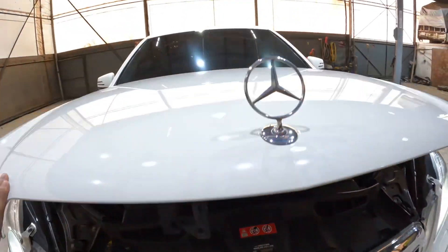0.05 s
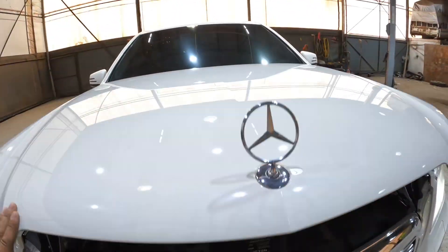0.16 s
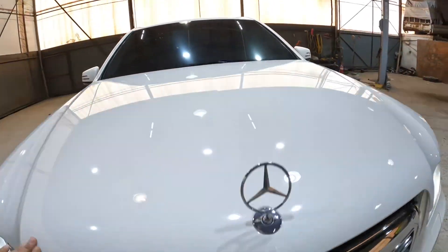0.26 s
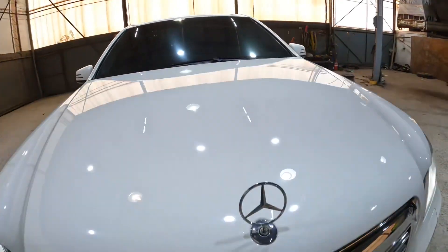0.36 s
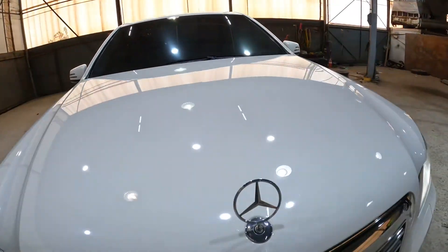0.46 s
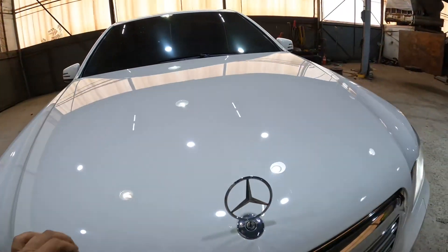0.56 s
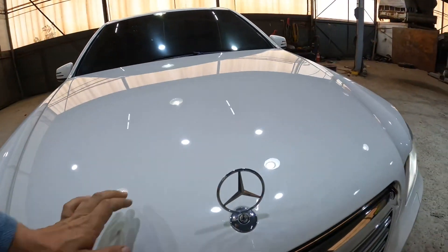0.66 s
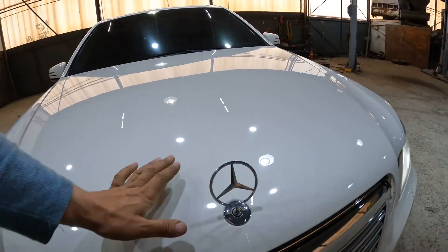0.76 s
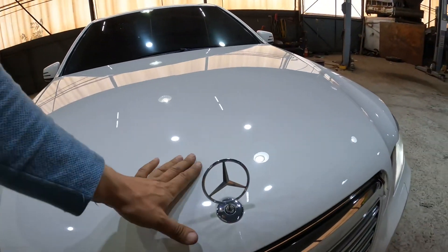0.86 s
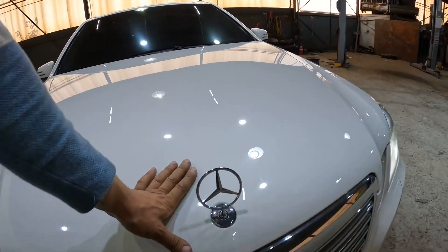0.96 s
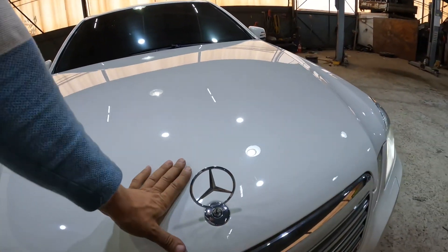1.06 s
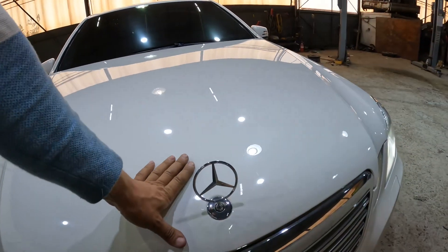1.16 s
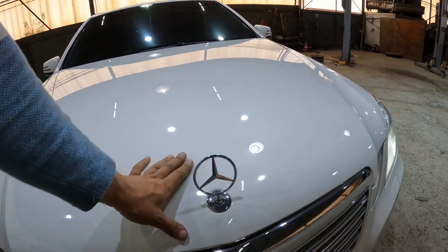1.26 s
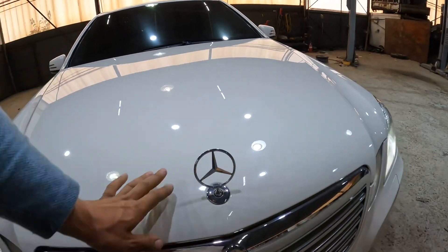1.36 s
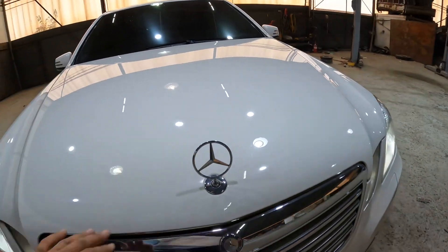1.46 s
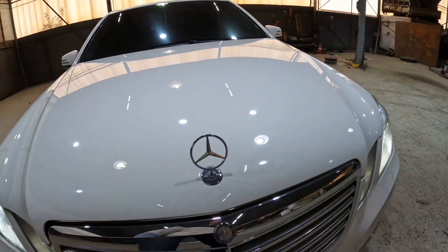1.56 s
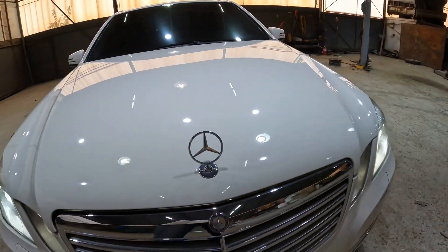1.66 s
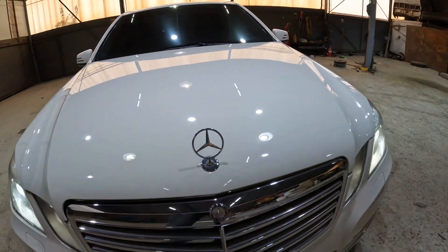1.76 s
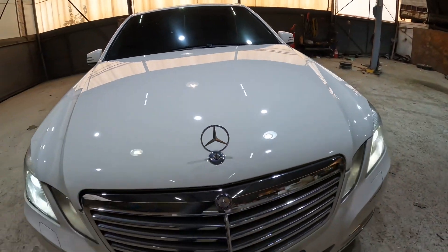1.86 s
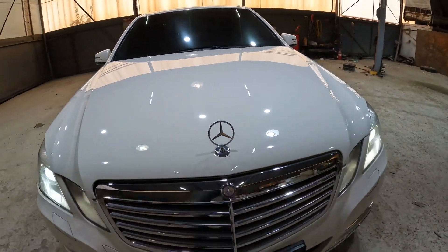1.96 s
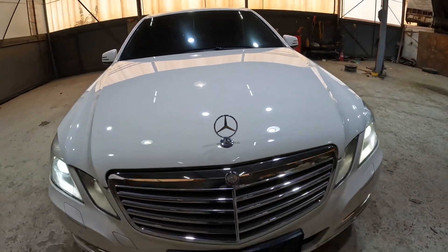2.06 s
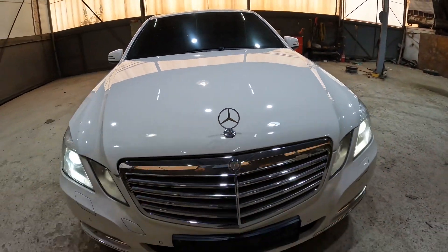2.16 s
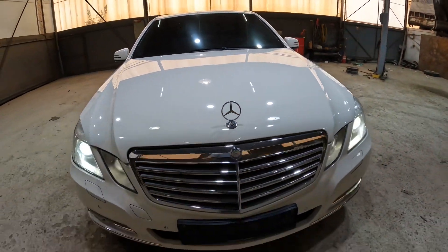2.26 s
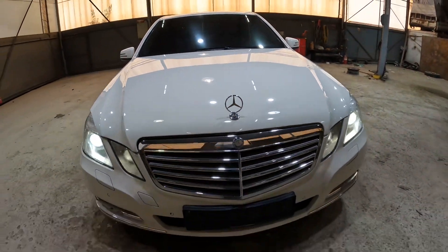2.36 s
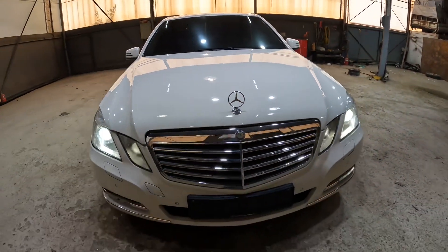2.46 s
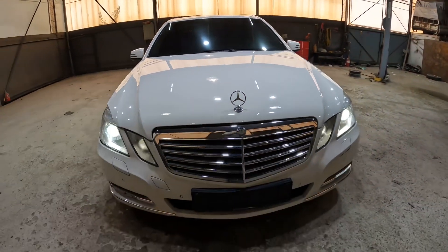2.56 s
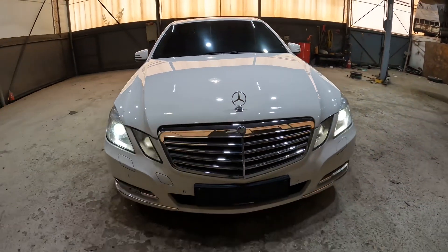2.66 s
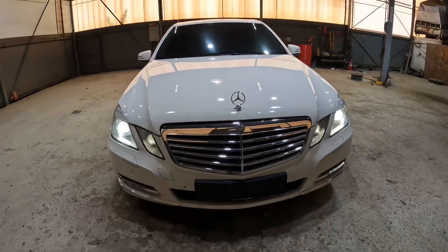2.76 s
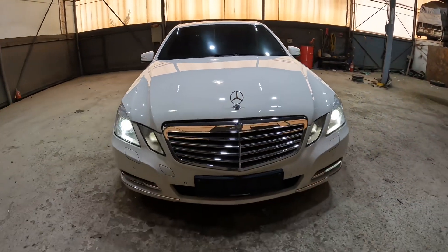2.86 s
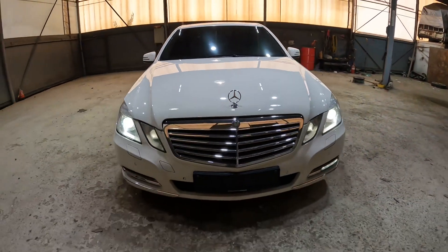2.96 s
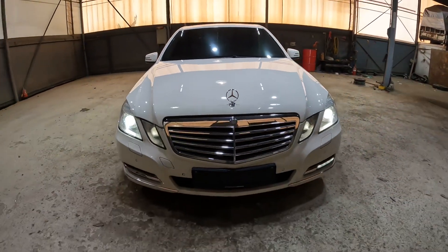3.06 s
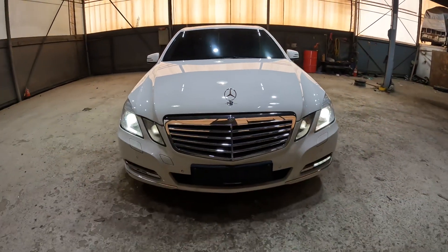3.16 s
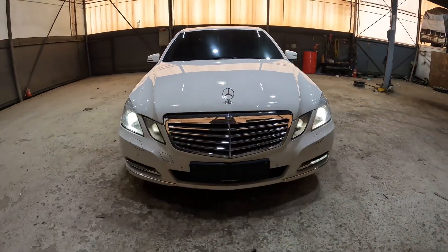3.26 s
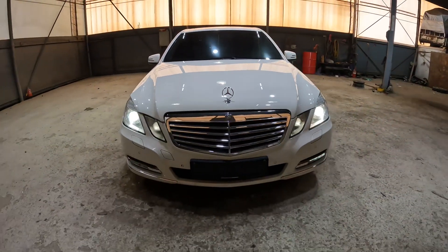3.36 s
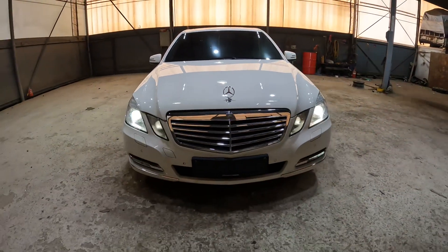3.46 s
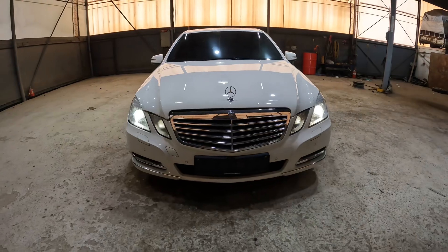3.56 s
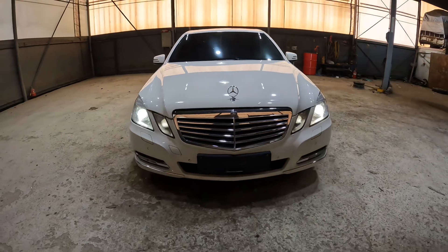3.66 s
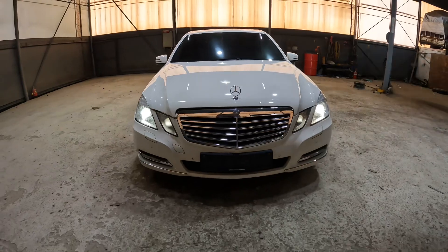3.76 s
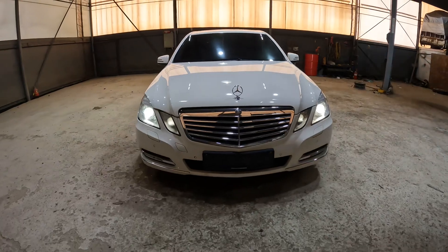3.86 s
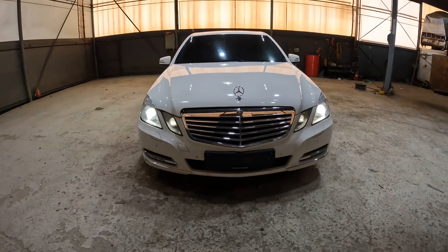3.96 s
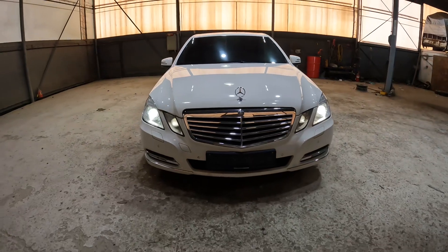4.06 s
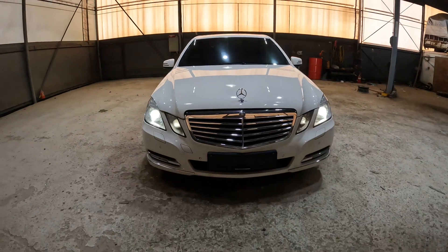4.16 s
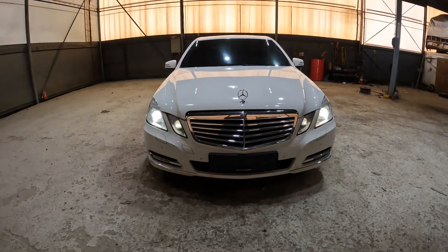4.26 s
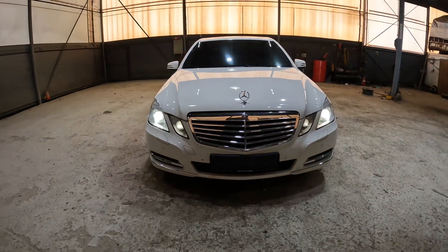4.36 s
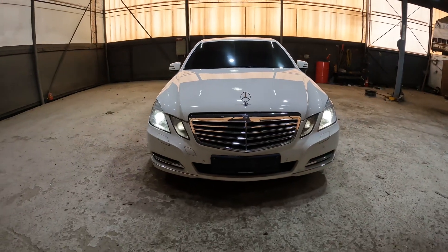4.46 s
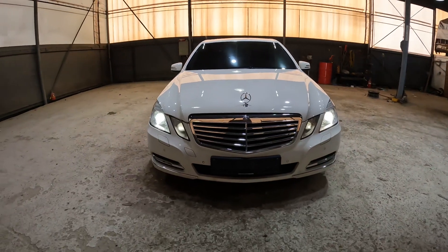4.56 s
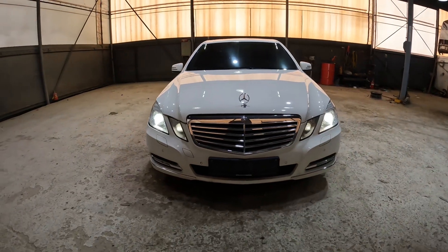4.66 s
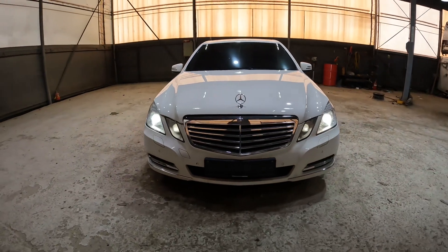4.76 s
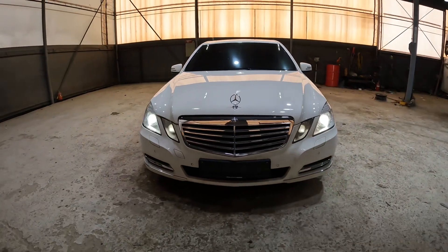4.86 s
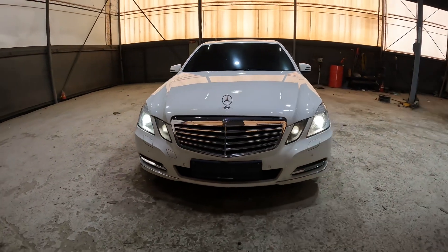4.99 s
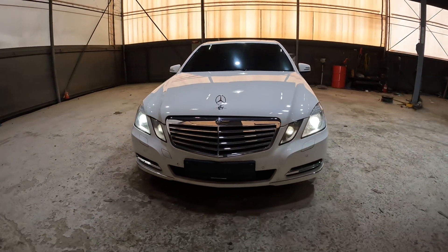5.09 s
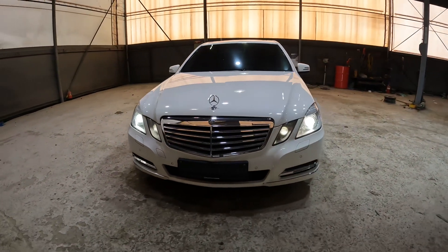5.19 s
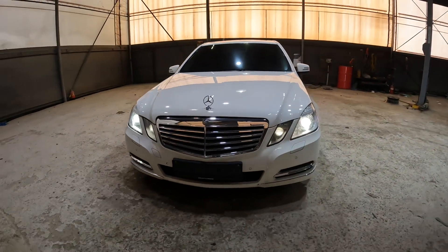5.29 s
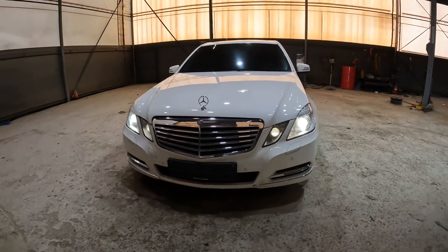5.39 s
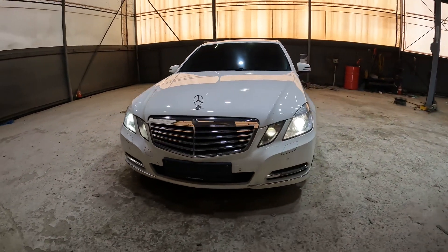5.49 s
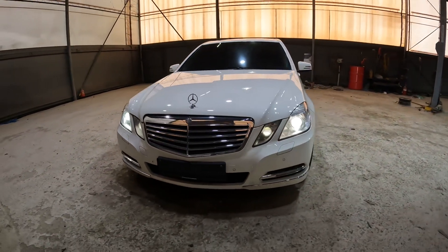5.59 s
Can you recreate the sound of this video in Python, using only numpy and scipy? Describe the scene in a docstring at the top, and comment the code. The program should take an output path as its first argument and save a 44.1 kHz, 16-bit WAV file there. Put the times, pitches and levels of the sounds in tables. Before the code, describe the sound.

A car engine idles steadily in a big hard-walled shed, heard close by with the hood raised: low throbbing rumble, whirring fan and belts, fine ticking hiss. At about 0.36 s the hood drops onto its latch with a sharp metallic clack, sheet-metal clatter and hollow boom, rebounding in a rapid rattle until about 0.57 s. Echoes fade and the engine turns muffled. At 1.06 s the hood is pressed home with a tight cluster of thumps and latch cracks; a tiny spring tick follows near 1.25 s. From 1.6 s the listener backs away and the engine gradually grows louder through the grille, levelling near 2.8 s. Thin squeaks and grit snaps come between 2.2 and 3.3 s, with a faint belt whistle swelling around 3.2 s. A soft bump lands at 3.1 s, a quick sole scuff at 3.55 s, and deep soft bumps at 4.4 and 4.9 s over the unbroken idle to the end.

```python
"""A car engine idles in a large shed; its hood drops, rattles and rebounds, then is pressed home with a thump.
The shut hood muffles the engine. The listener steps back over gritty concrete, with small squeaks,
bumps and a scuff, and the engine and its fan grow louder again through the grille.
The engine is coloured noise, steady hums and wavering whistles, pulsing as the cylinders fire.
The hood is ringing tones and short noise bursts; steps are bursts, squeaks are unsteady tones, all with echoes."""
import sys
import numpy as np
from scipy import signal
from scipy.fft import rfft, irfft
from scipy.io import wavfile

SR = 44100
rng = np.random.default_rng(int(sys.argv[2]) if len(sys.argv) > 2 else 0)


def unload_wav(signal):
    """Save mono or channel-first audio to the path in sys.argv[1] as 16-bit WAV at rate SR, clipped to [-1, 1]."""
    wavfile.write(
        sys.argv[1],
        SR,
        np.round(np.clip(np.atleast_2d(signal).T, -1, 1) * 32767).astype(np.int16),
    )


N = 248283
TIME = np.arange(N) / SR

# colour of deep rumbles, from engine, car body and steps: (frequency [Hz], level [dB per Hz])
RUMBLE_COLOUR = [(8, -1), (26, 2.5), (48, -1), (75, -9.5), (120, -12), (190, -15.5), (250, -27), (400, -49)]
# dense higher modes of the hood's sheet metal: (frequency [Hz], level [dB per Hz])
SHEET_COLOUR = [(50, -22), (130, 6), (200, 4), (360, -0.5), (550, -6), (800, -5.5), (1300, -11),
                (2100, -18), (4000, -24.5), (10000, -43.5)]
# sharp cracks, of the latch and of grit: (frequency [Hz], level [dB per Hz])
CRACK_COLOUR = [(400, -23), (1000, 1.5), (2000, 4.5), (3200, 2), (5400, 0.5), (7400, -5), (8800, -15),
                (10300, -7.5), (14500, -28)]

# the listener steps back, out of the hood's shadow and then away from the engine bay [s]
LEAVES_S, FACES_GRILLE_S, STOPS_S = 1.56, 2.795, 3.2


def from_db(db):
    """Turn decibels into a gain."""
    return 10 ** (np.asarray(db) / 20)


def rms_one(x):
    """Scale a sound to unit power."""
    return x / np.sqrt(np.mean(x ** 2) + 1e-20)


def at_hz(points, hz):
    """Read a table between its points, on a logarithmic frequency axis."""
    table_hz, value = np.transpose(points)
    return np.interp(np.log(np.maximum(hz, 1)), np.log(table_hz), value)


def ramp(start_s, end_s):
    """Rise evenly from 0 to 1 between two times."""
    return np.clip((TIME - start_s) / (end_s - start_s), 0, 1)


def noise(colour, size=N, side_db=0):
    """Stereo noise of a given colour that weakens beyond the colour's ends; unit power."""
    # how wide the stereo is: (frequency [Hz], side relative to mid [dB])
    stereo_width = [(30, -12.5), (90, -32.5), (250, -16), (500, -11), (1100, -9.5), (2000, -5), (4500, -8),
                    (9000, -7.5), (14000, -3)]
    hz = np.arange(size // 2 + 1) * SR / size
    low_end = np.minimum(1, hz / colour[0][0])
    high_end = np.minimum(1, colour[-1][0] / (hz + 1))
    shape = from_db(at_hz(colour, hz)) * (low_end * high_end) ** 2
    mid, side = rfft(rng.standard_normal((2, size))) * shape
    side = side * from_db(at_hz(stereo_width, hz) + side_db)
    return rms_one(irfft([mid + side, mid - side], size))   # left, right


def drift(rate_hz):
    """Smooth random wandering of unit power; a higher rate wanders faster."""
    hz = np.arange(N // 2 + 1) * SR / N
    smoothed = rfft(rng.standard_normal(N)) / (1 + (hz / rate_hz) ** 2) ** 2
    return rms_one(irfft(smoothed, N))


def resonate(x, hz, width_hz):
    """Let one resonance pick out the sound around its frequency; unit power."""
    r = np.exp(-np.pi * width_hz / SR)
    return rms_one(signal.lfilter([1, 0, -1], [1, -2 * r * np.cos(2 * np.pi * hz / SR), r * r], x))


def dulled(x, hz):
    """Gently weaken the treble above a frequency."""
    return signal.sosfilt(signal.butter(1, hz, fs=SR, output="sos"), x)


def dying(t60_s, size=22050):
    """Fade from 1, losing 60 dB in t60_s seconds."""
    return np.exp(-np.log(1000) * TIME[:size] / t60_s)


def struck(modes, scatter_db, contact_s, size=22050):
    """Fading tones of random strength on each blow; a longer contact softens the start."""
    t, rings = TIME[:size], 0
    for hz, db, t60_s in modes:
        strength = from_db(db + scatter_db * rng.standard_normal())
        rings = rings + strength * dying(t60_s, size) * np.sin(2 * np.pi * hz * t)
    return rings * (1 - np.exp(-t / contact_s))


def burst(colour, t60_s, rise_s=0.00022, size=22050):
    """Many close modes struck at once and dying together, made as fading noise."""
    rise = 1 - np.exp(-TIME[:size] / rise_s)
    return noise(colour, size=size, side_db=-1.5) * dying(t60_s, size) * rise


def add(out, s, sound):
    """Mix a sound in at time s."""
    i = int(s * SR)
    out[:, i:i + sound.shape[-1]] += sound[..., :N - i]


def shed(x, build_s=0.02, size=57330):
    """Blurred echoes build up as sound returns from the far walls; each band fades at its own pace."""
    # echo fading: (frequency [Hz], time to lose 60 dB [s])
    fading = [(60, 0.9), (250, 0.95), (1300, 0.97), (4000, 1.44), (8000, 0.54), (14000, 0.53)]
    # colour of the echoes: (frequency [Hz], level [dB per Hz])
    echo_colour = [(40, 6.0), (200, 3.5), (700, 5), (2000, -5.5), (5000, -9.0), (15000, 1.5)]
    echoes, tail = noise(echo_colour, size=size), 0
    edges = np.geomspace(40, 16000, 10)
    for low, high in zip(edges, edges[1:]):
        band = signal.sosfilt(signal.butter(2, [low, high], "band", fs=SR, output="sos"), echoes)
        tail = tail + band * dying(at_hz(fading, np.sqrt(low * high)), size)
    build_up = 1 - np.exp(-(TIME[:size] / build_s) ** 2)
    tail = rms_one(tail * build_up) / np.sqrt(size)
    return signal.fftconvolve(x.mean(axis=0)[None], tail, axes=1)[:, :N]


def engine_levels():
    """Gains of rumble, whirr and hiss, which escape past the open hood and through the grille."""
    # each: (level under the shut hood [dB], gain with hood raised [dB], gain in front of the grille [dB])
    rumble_db = (-38.5, 15, 10.5)
    whirr_db = (-43, 13, 9)
    hiss_db = (-53.5, 17, 11)
    # the hood falls until it meets the latch; the sound it let out then fades in the shed
    lands_s, opening_at_landing, fade_s = 0.34, 0.73, 0.37
    falling = 1 - (1 - opening_at_landing) * ramp(0, lands_s)
    fading = np.exp(-np.maximum(TIME - lands_s, 0) ** 2 / fade_s ** 2)
    opening = falling * fading
    facing = ramp(LEAVES_S, FACES_GRILLE_S)
    return [from_db(shut_db + open_db * opening + grille_db * facing)
            for shut_db, open_db, grille_db in (rumble_db, whirr_db, hiss_db)]


def whistle(clock, hz, width_hz=180.0, flicker_db=2.5):
    """A thin, noisy tone whose strength wavers at random."""
    phase = 2 * np.pi * hz * clock
    line = drift(width_hz) * np.cos(phase) + drift(width_hz) * np.sin(phase)
    return line * from_db(flicker_db * drift(44.0))


def belt(clock, nearness):
    """Belt-drive whistles: the upper fades away from the bay, the lower swells in a narrow beam from the grille."""
    beam_s, beam_width_s, beam_db = 3.23, 0.3, 16   # when the listener crosses it, for how long, its gain
    beam = np.exp(-((TIME - beam_s) / beam_width_s) ** 2)
    upper = from_db(-4) * nearness * whistle(clock, hz=5100)
    lower = from_db(-27.5 + beam_db * beam) * whistle(clock, hz=4240)
    return upper + lower


def engine(firing_hz=35.08, throb=0.18, tick_db=0.9, tick_hz=85.6, repeating_db=-10.5):
    """Hum and rumble, a whirr of belts and fan throbbing with the firings, and a finely ticking hiss."""
    # steady hum of engine and fan: (frequency [Hz], level [dB])
    hums = [(35.2, -13), (56, -8.5), (105.6, -16.5), (112, -12.5), (121, -21), (168, -18.5), (178.5, -20.5),
            (211, -19), (360, -27.5)]
    # narrow resonances of the engine bay: (frequency [Hz], width [Hz], level [dB])
    bay_resonances = [(1014, 94, -20), (1114, 130, -21), (1442, 12, -16)]
    # colours of the whirr, hiss and sizzle: (frequency [Hz], level [dB per Hz])
    whirr_colour = [(130, -42), (230, 3.5), (310, -2), (510, 2), (780, -3.5), (960, 2), (1450, -1.5),
                    (2050, -3.5), (2400, -12), (3500, -18.5)]
    hiss_colour = [(1400, -10), (2200, 2.5), (2900, 4), (3600, 0.5), (4500, 2), (6200, -7), (7500, -4),
                   (8300, -16), (9300, -16.5), (10400, -13.5), (12300, -24.5), (14500, -38)]
    sizzle_colour = [(4200, -12), (5200, 4), (6200, 6.5), (7500, -4), (8500, -11), (10300, -2),
                     (12000, -19), (14500, -23)]
    rumble_gain, whirr_gain, hiss_gain = engine_levels()
    clock = np.cumsum(1 + .004 * drift(3.03)) / SR   # idle speed wanders slightly
    firing = 1 + throb * np.cos(2 * np.pi * firing_hz * clock)

    hum = 0
    for hz, db in hums:
        tone = np.sqrt(2) * np.sin(2 * np.pi * (hz * clock + rng.random()))
        hum = hum + from_db(db + 2.0 * drift(2.4)) * tone
    low = from_db(-2.5) * noise(RUMBLE_COLOUR) * firing + from_db(-3.5) * hum

    bay = sum(from_db(db) * resonate(noise(whirr_colour), hz, width_hz) for hz, width_hz, db in bay_resonances)
    # part of the whirr comes round again with each turn of the crank: three firings
    turn = int(3 * SR / firing_hz)
    repeating = np.interp(clock * SR, np.arange(turn), noise(whirr_colour, size=turn)[0], period=turn)
    whirr = from_db(-3.5) * noise(whirr_colour) + from_db(repeating_db) * repeating + bay
    middle = whirr * np.sqrt(firing)

    # close up, the bay sizzles and the engine sets the hood panel droning; both weaken over the retreat
    near_db, retreat_loss_db = -6.5, 17
    nearness = from_db(near_db - retreat_loss_db * ramp(LEAVES_S, STOPS_S) ** 2)
    sizzle = from_db(-3.5) * nearness * noise(sizzle_colour)
    drone = from_db(-0.5) * nearness * resonate(noise(SHEET_COLOUR), hz=355, width_hz=200)

    ticking = from_db(tick_db * (np.cos(2 * np.pi * tick_hz * clock) + .5 * drift(60.0)))
    high = (from_db(-1.5) * noise(hiss_colour) + sizzle + belt(clock, nearness)) * ticking
    return rumble_gain * low + whirr_gain * (middle + drone) + hiss_gain * high


def hood():
    """Each contact booms in the panel, clatters in the sheet, cracks in the latch and shakes the car's body."""
    # contacts as the hood drops, rebounds and is pressed home:
    # (time [s], panel boom [dB], sheet clatter [dB], latch crack [dB])
    blows = [(0.3627, -26, -13.5, -8.5), (0.3848, -17.5, -11.5, -18), (.390, -32, -14, -11.5),
             (.395, -27, -12, -12.5), (.413, -16.5, -14, -15), (0.4231, -24, -19, -19),
             (.428, -10.5, -21.5, -30), (0.4411, -16, -32, -40), (0.4482, -31, -25, -20),
             (.51, -33.5, -17.5, -22), (.565, -28, -19, -36), (1.059, -15, -19, -14.5),
             (1.068, -23, -12, -16.5), (1.075, -11, -18, -26), (1.083, -14, -22, -24),
             (1.251, -37, -27.5, -50)]
    # modes of the hood panel: (frequency [Hz], level [dB], time to lose 60 dB [s])
    panel_modes = [(76.7, -3, 0.27), (89.5, -3, 0.14), (114, -3.5, 0.16), (164, -7, 0.16), (197, -13, 0.12),
                   (263.4, -18, 0.32), (356, -8, 0.16), (457.4, -15.5, 0.11), (659, -22, 0.15),
                   (768, -15, 0.058), (886, -25, 0.067), (1070, -22, 0.29), (1354, -29, 0.12),
                   (1632, -13.5, 0.051)]
    # modes of the steel latch: (frequency [Hz], level [dB], time to lose 60 dB [s])
    latch_modes = [(1820, -14, .05), (2092, -10.5, 0.12), (2380, -9, 0.056), (2910, -7, 0.065),
                   (3240, -4, 0.026), (3625, -12, 0.084), (3800, -23, 0.1), (4200, -18, 0.052),
                   (5290, -2, 0.025), (7520, -16, 0.056)]
    # the latch spring settling: (time [s], level [dB])
    spring_moves = [(1.2175, -30.5), (1.2436, -32)]
    # colour of the spring: (frequency [Hz], level [dB per Hz])
    spring_colour = [(1200, -5), (2700, -11.5), (3100, -2), (3300, 2.5), (3550, -18), (6000, -30),
                     (12000, -42)]
    home_s = 1.0   # from here on the hood is pressed home
    near, sent = np.zeros((2, 2, N))
    for s, boom_db, sheet_db, latch_db in blows:
        if s < home_s:   # still ajar
            send_db, dull_hz = 0, 8000
        else:            # home: less goes into the shed, but the crack is brighter
            send_db, dull_hz = -3.5, .45 * SR
        boom = from_db(boom_db) * struck(panel_modes, scatter_db=4.0, contact_s=0.00071)
        sheet = from_db(sheet_db) * burst(SHEET_COLOUR, t60_s=0.14)
        ring = struck(latch_modes, scatter_db=4.0, contact_s=0.00025)
        crack = burst(CRACK_COLOUR, t60_s=0.049) + from_db(-5.0) * ring
        latch = dulled(from_db(latch_db) * crack, dull_hz)
        # the car's body shudders after every boom
        shudder = from_db(boom_db - 16 + send_db) * burst(RUMBLE_COLOUR, t60_s=0.99, rise_s=.04)
        add(near, s, boom + sheet + latch + shudder)
        # the boom stays mostly near the panel
        add(sent, s, from_db(send_db) * (from_db(-5.0) * boom + sheet + latch))
    for s, db in spring_moves:
        add(near, s, from_db(db) * burst(spring_colour, t60_s=0.08))
    return near + from_db(-9.0) * shed(sent)


def squeaks(swell_s=0.0056, waver=0.011, size=4410):
    """Brief, thin rubbing tones with an unsteady pitch swell and fade."""
    # each squeak: (time [s], level [dB], pitch [Hz])
    squeak_list = [(2.2357, -47.5, 5160), (2.655, -47, 5170), (2.694, -42, 4680), (2.718, -45, 4760),
                   (2.85, -40.5, 4230), (3.061, -43.5, 4340), (3.284, -41, 4240)]
    # tones within a squeak: (multiple of the pitch [ratio], level [dB])
    partials = [(1.002, 5), (1.981, -12), (2.88, -20)]
    out, t = np.zeros((2, N)), TIME[:size]
    unsteady = 1 + waver * drift(260.0)
    swell = t / swell_s * np.exp(1 - t / swell_s)
    for s, db, hz in squeak_list:
        phase = 2 * np.pi * hz * np.cumsum(unsteady[int(s * SR):][:size]) / SR
        tone = sum(from_db(level_db) * np.sin(multiple * phase) for multiple, level_db in partials)
        add(out, s, from_db(db) * swell * tone * from_db([[1.5], [-2.0]]))   # louder on the left
    return out + from_db(-2.0) * shed(out)


def footsteps():
    """Steps bump softly and grit snaps under the shoes; one sole scuffs in a few quick slips."""
    # grit cracking underfoot: (time [s], level [dB], dulled above [Hz])
    grit = [(2.697, -34, 12000), (2.8533, -31.5, 14000), (2.9686, -33, 10000), (3.2224, -21, 1500)]
    # soft, deep bumps of the steps: (time [s], level [dB])
    bumps = [(3.07, -21.5), (3.55, -25.5), (4.40, -20.5), (4.93, -20.5)]
    # a sole slipping on the concrete: (time [s], level [dB])
    slips = [(3.551, -24.5), (3.559, -21.5), (3.573, -21), (3.579, -24.5), (3.585, -31)]
    # colour of the slipping sole: (frequency [Hz], level [dB per Hz])
    sole_colour = [(700, -15), (1400, -7), (1800, 2.5), (2250, -3), (3000, -15.5), (5000, -16.5),
                   (8000, -32), (13000, -50)]
    out = np.zeros((2, N))
    for s, db, dull_hz in grit:
        add(out, s, from_db(db) * dulled(burst(CRACK_COLOUR, t60_s=0.043), dull_hz))
    for s, db in bumps:
        add(out, s, from_db(db) * burst(RUMBLE_COLOUR, t60_s=0.36, rise_s=0.007))
    for s, db in slips:
        slip = burst(sole_colour, t60_s=0.081, rise_s=0.0012)
        add(out, s, from_db(db) * slip * from_db([[1.5], [-1.5]]))   # louder on the left
    return out + from_db(-7.5) * shed(out)


def scene():
    """Engine, hood, squeaks and feet together; the highest treble is stronger on the left."""
    both = engine() + hood() + squeaks() + footsteps()
    top = signal.sosfilt(signal.butter(1, 11000, "high", fs=SR, output="sos"), both)
    return both + 0.29 * top * [[1], [-1]]


def record(dry):
    """Round off the peaks, then cut the treble steeply above 14600 Hz."""
    rounded = np.tanh(dry)
    return signal.sosfilt(signal.ellip(10, .1, 90, 14600, fs=SR, output="sos"), rounded)


dry = scene()
out = record(dry)
unload_wav(out)
```